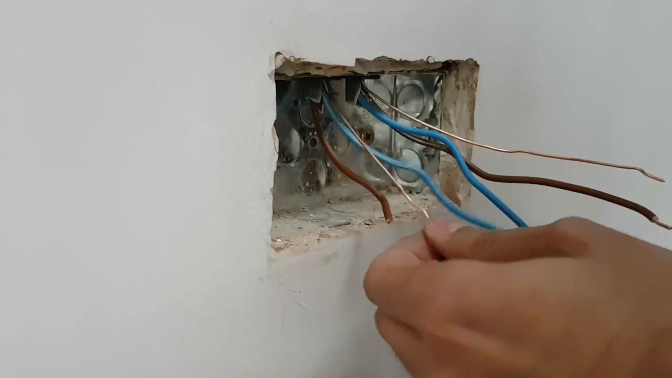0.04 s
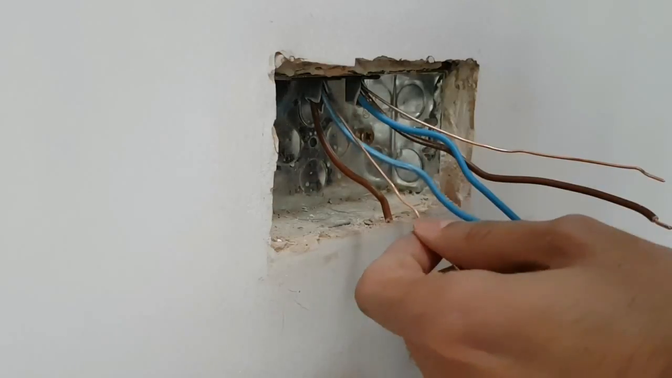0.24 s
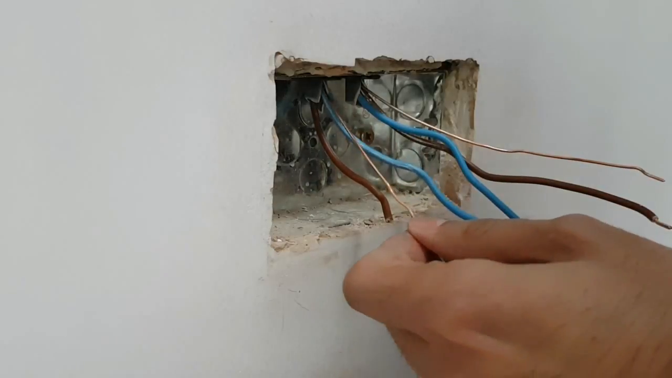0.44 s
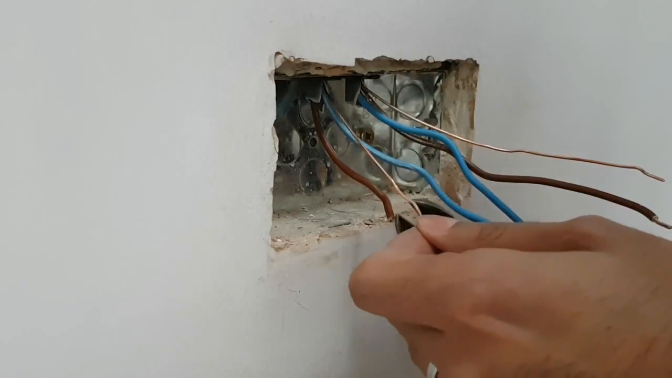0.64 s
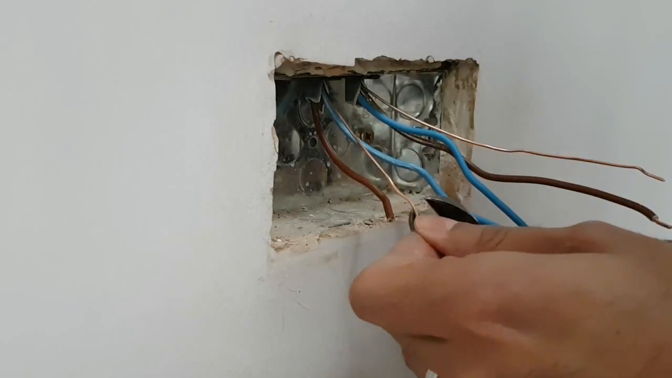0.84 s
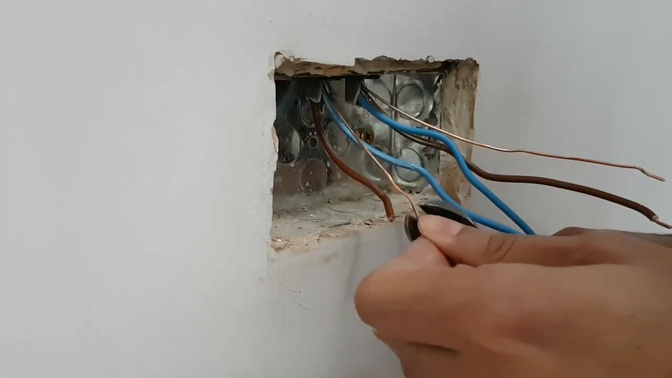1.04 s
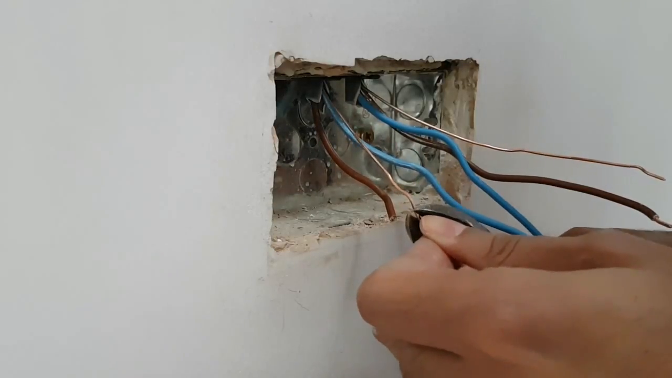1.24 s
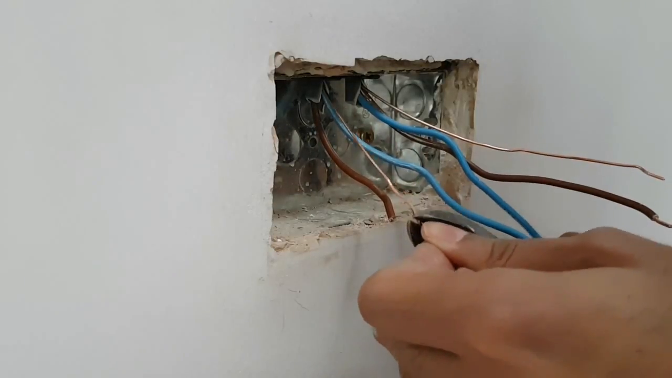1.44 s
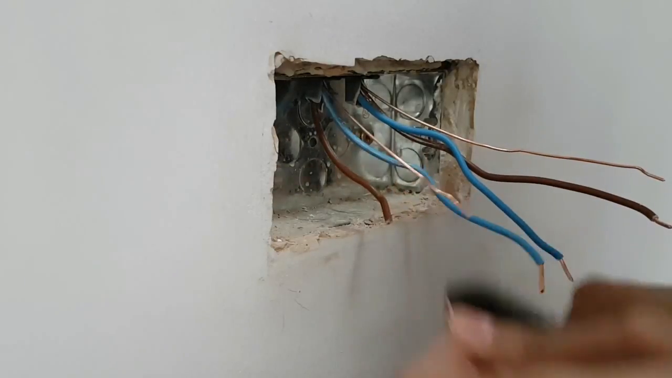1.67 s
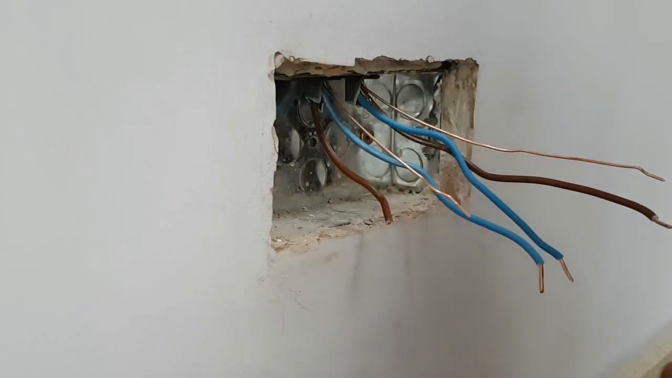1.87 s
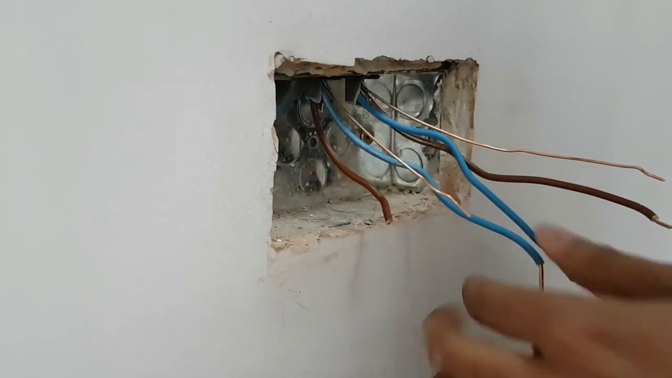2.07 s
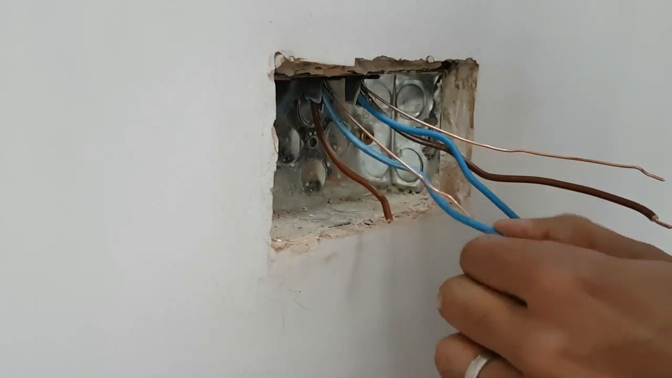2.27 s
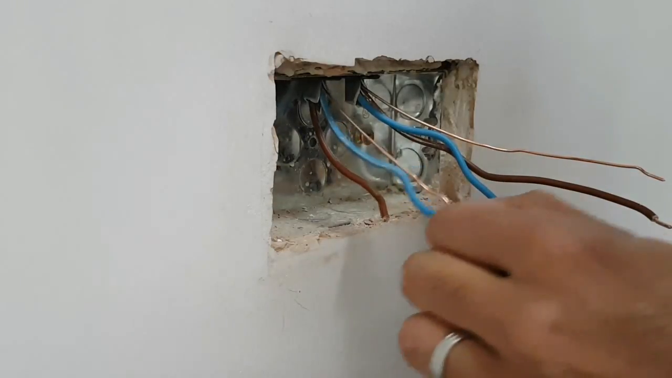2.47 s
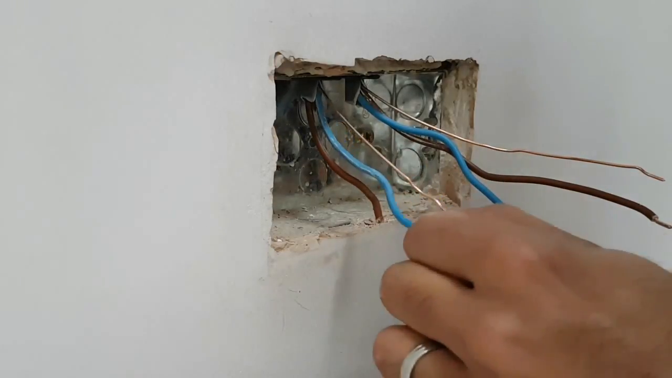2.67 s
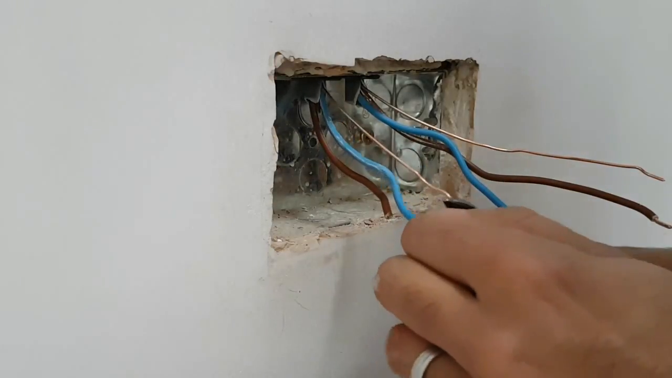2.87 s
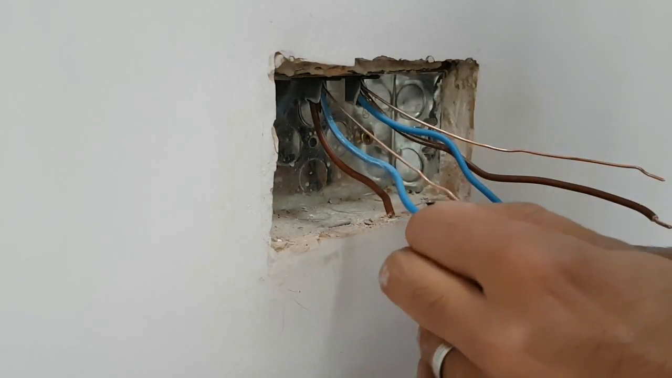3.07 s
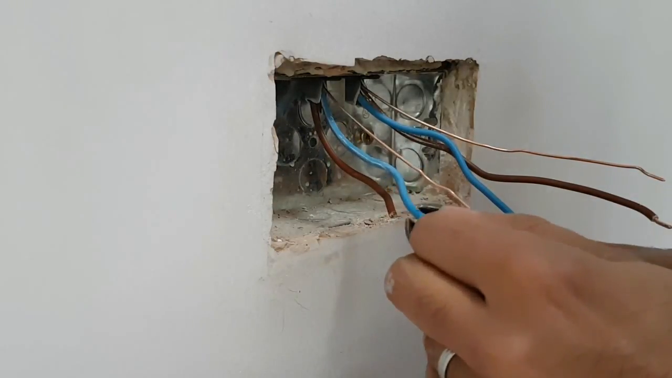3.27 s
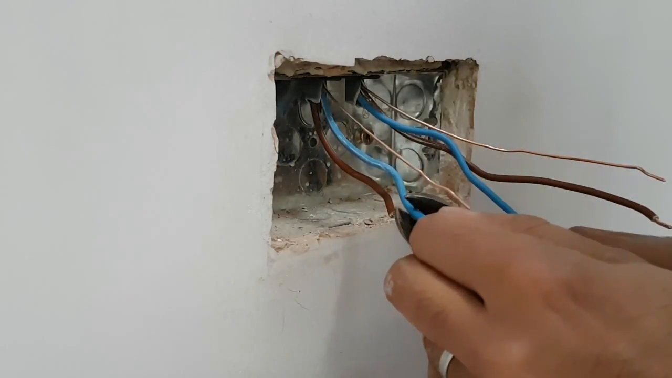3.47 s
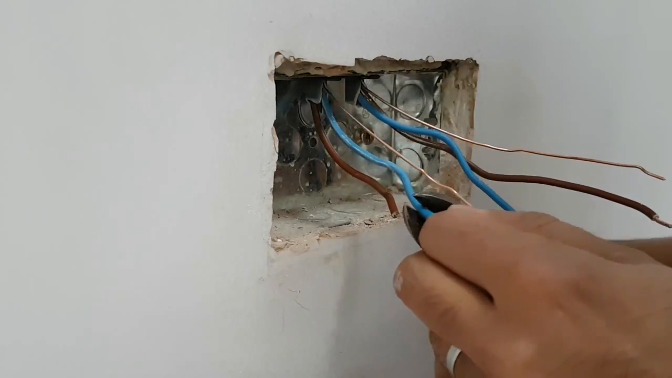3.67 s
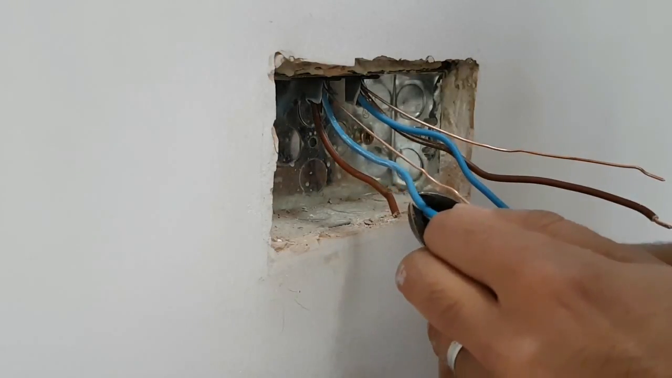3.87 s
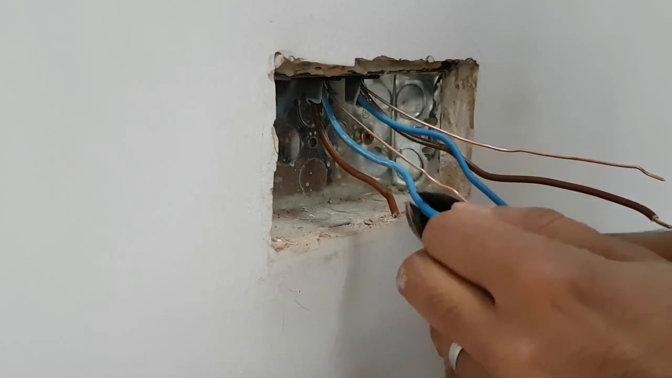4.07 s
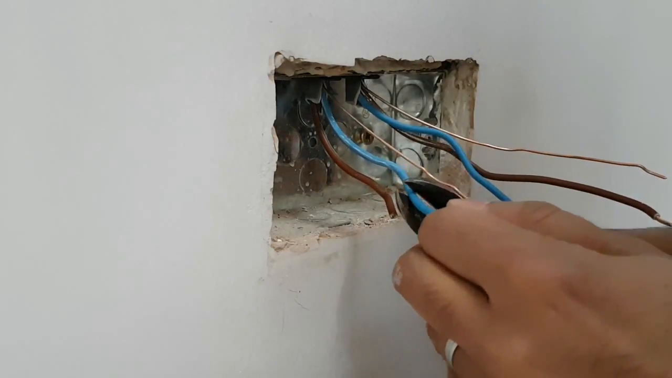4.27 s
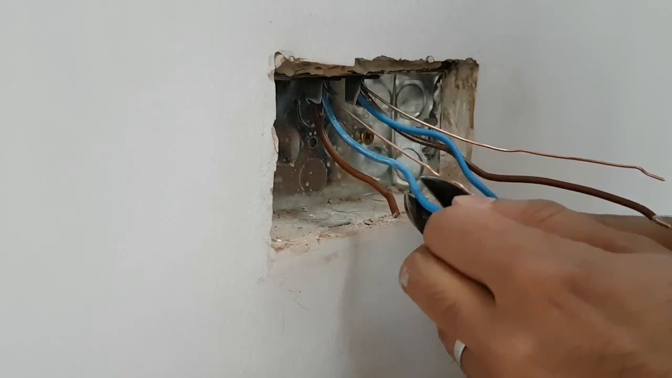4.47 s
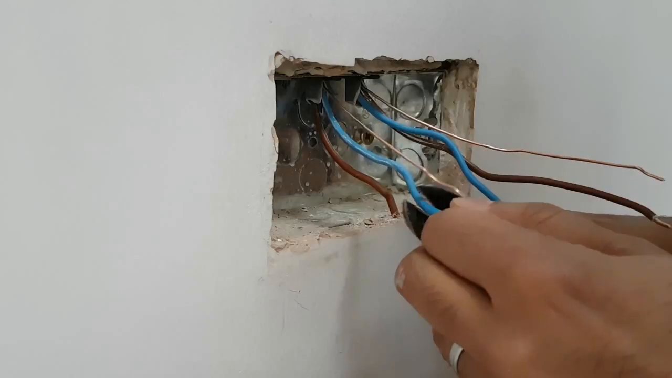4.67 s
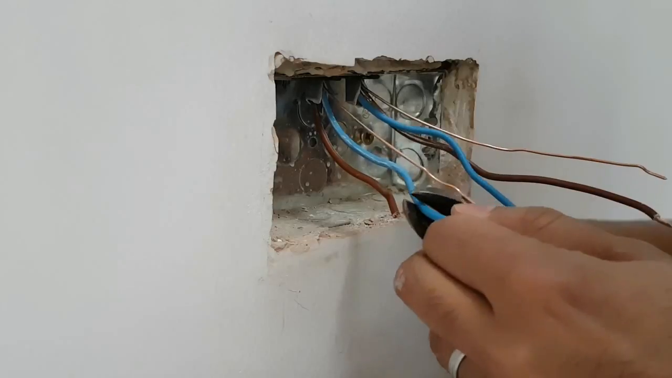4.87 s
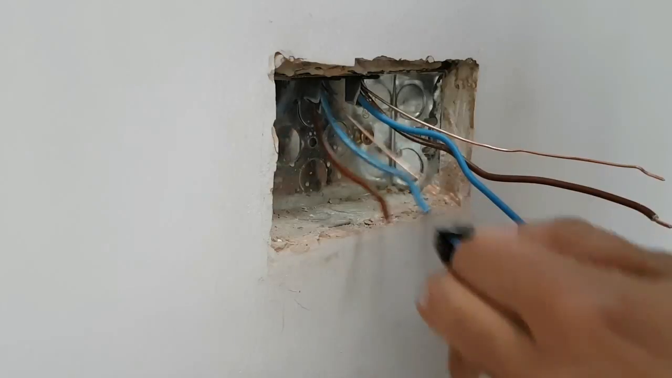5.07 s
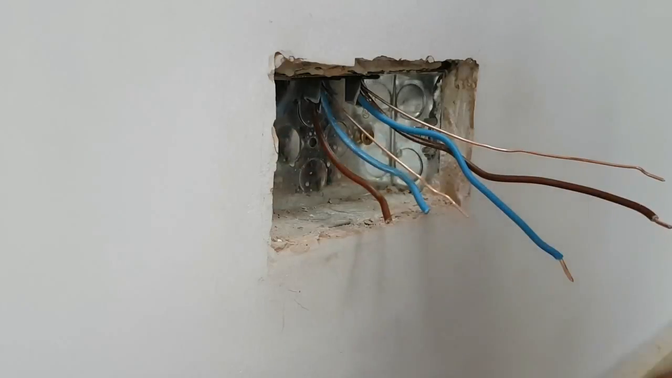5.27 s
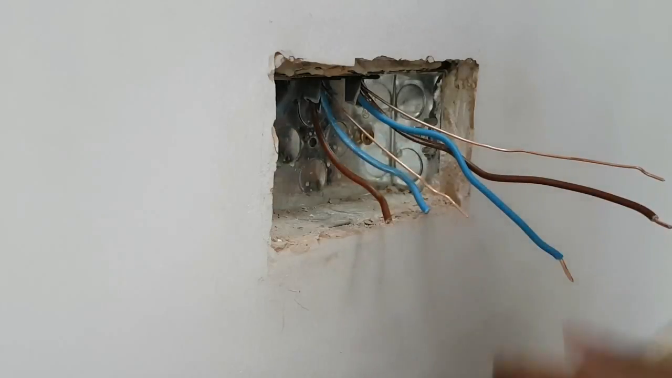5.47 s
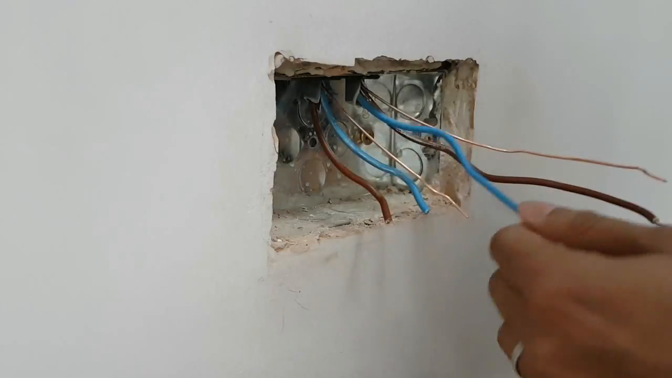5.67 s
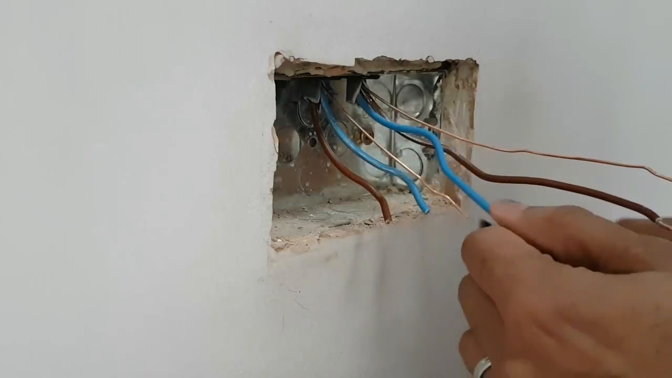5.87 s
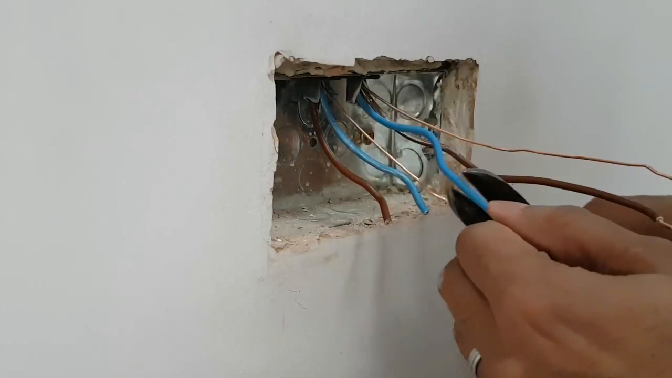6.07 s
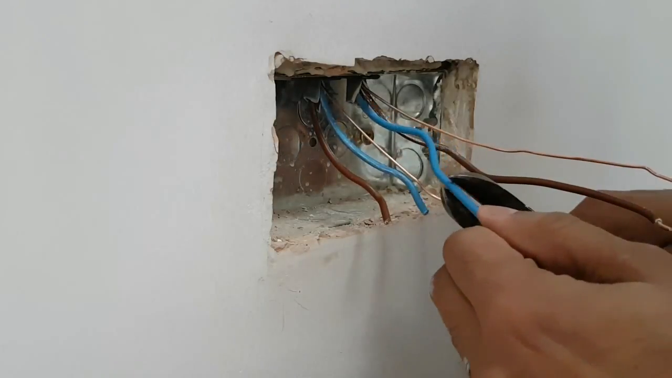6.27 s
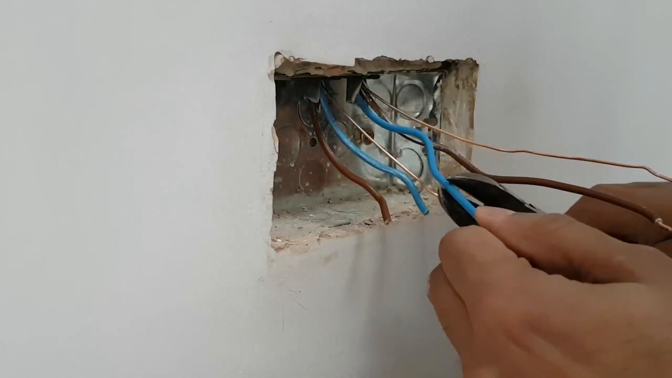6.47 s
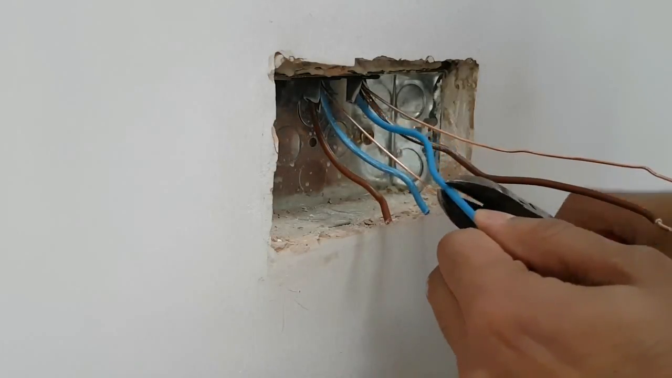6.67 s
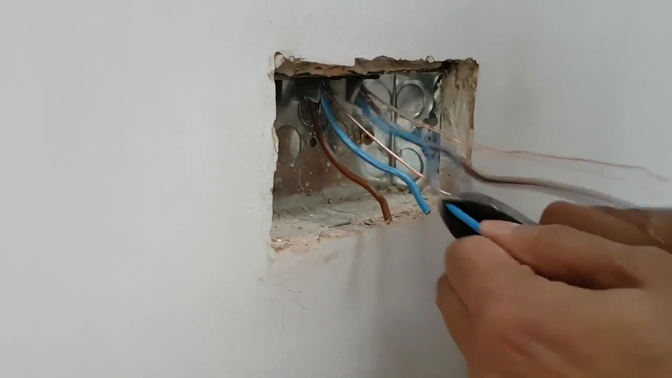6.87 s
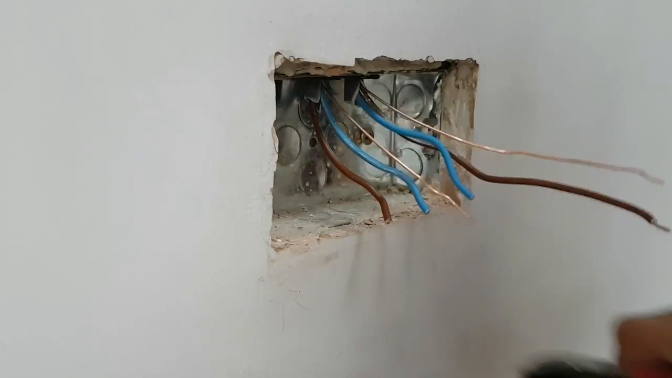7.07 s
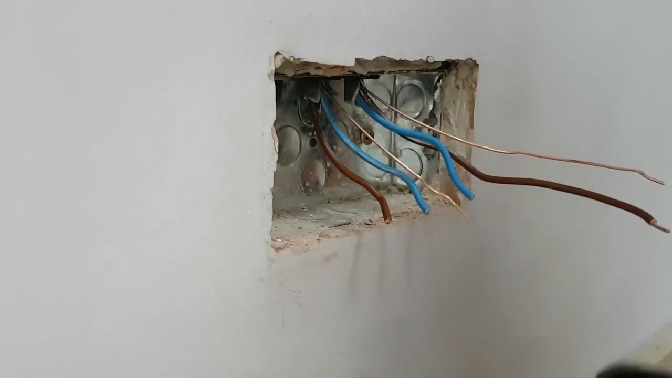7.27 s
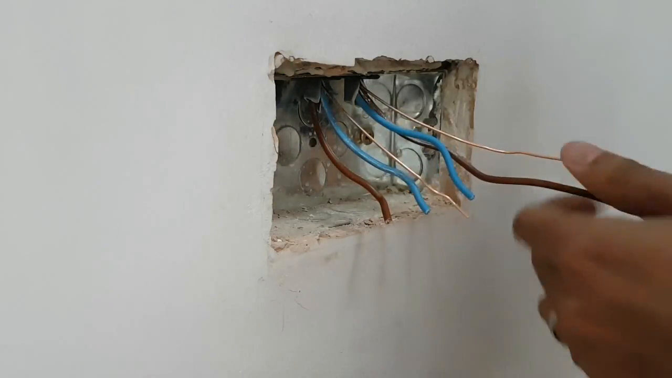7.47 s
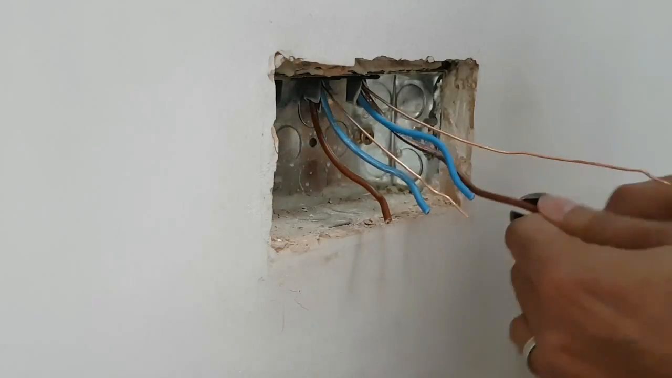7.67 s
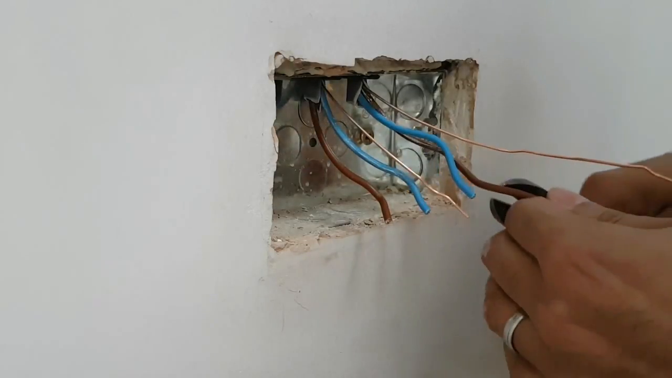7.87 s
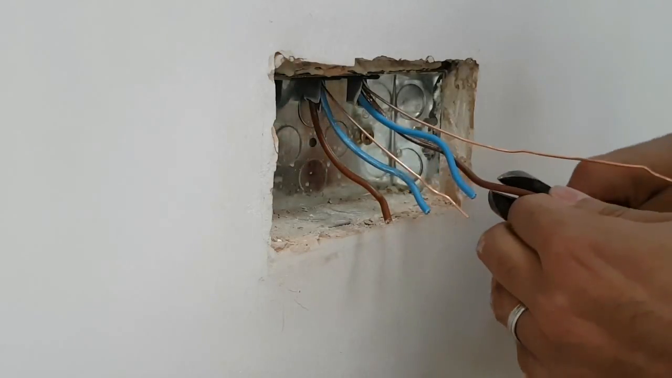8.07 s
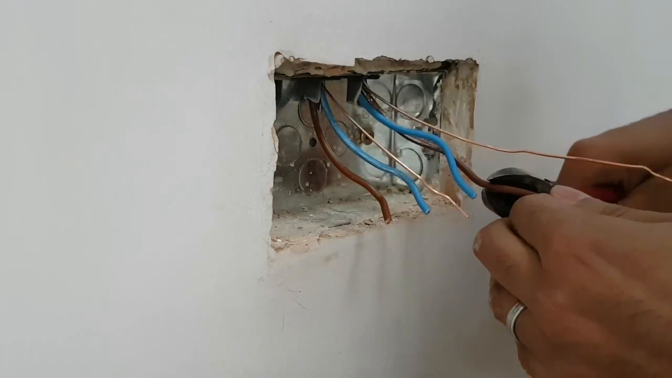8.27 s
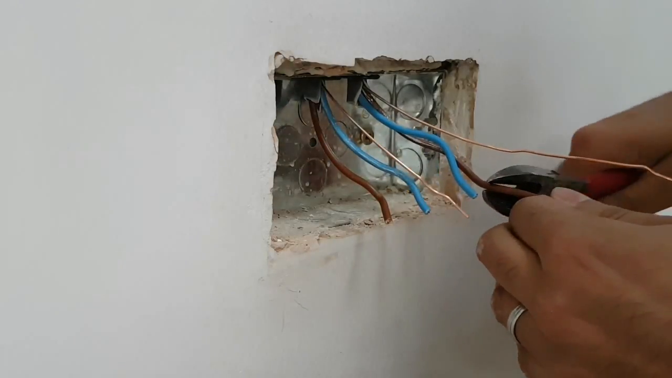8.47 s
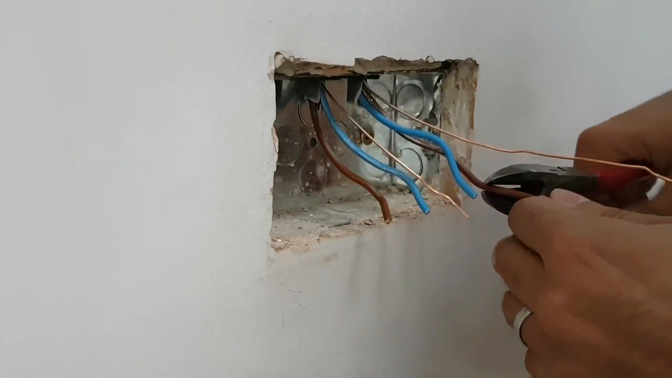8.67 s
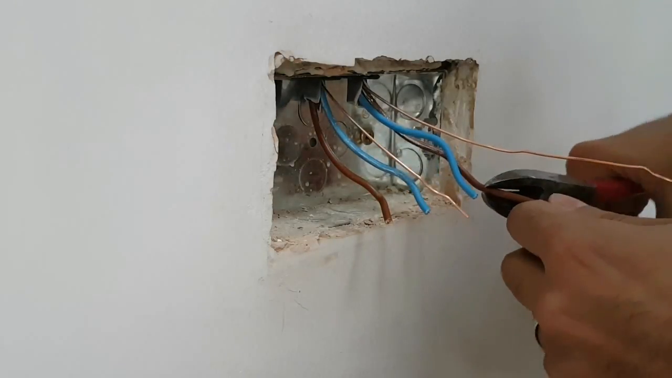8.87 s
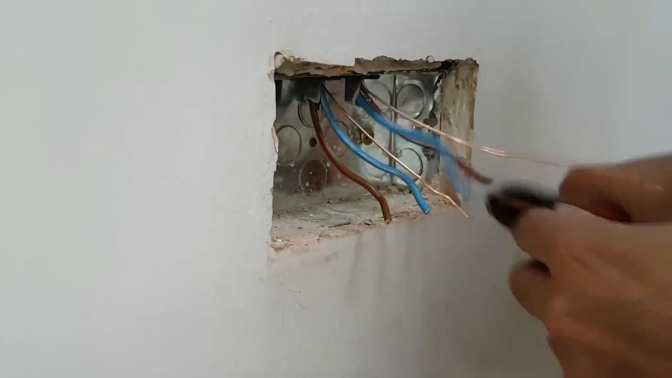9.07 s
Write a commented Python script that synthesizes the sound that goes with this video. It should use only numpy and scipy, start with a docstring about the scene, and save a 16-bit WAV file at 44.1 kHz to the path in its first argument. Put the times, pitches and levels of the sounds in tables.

```python
"""A bare, hard room, the stereo microphone close to side cutters at a wall box. Over quiet air and a faint
rumble that comes and goes, the jaws tick on a copper core. At 1.7 s it snaps, overloading the microphone;
the offcut lands across the room and bounces in ever shorter hops. The tool ticks, rubs and squeaks on the
insulation between this cut and two more, at 5.2 and 7.1 s, each with its own overload and falling offcut.
At last, at 8.7 s, the jaws bite into a fourth core with a dull knock."""
import sys
import numpy as np
from scipy import signal
from scipy.fft import rfft, irfft, next_fast_len
from scipy.io import wavfile
from scipy.ndimage import uniform_filter1d

SR = 44100
rng = np.random.default_rng(int(sys.argv[2]) if len(sys.argv) > 2 else 0)


def dump(signal):
    """Clip the signal to [-1, 1] and save it as 16-bit WAV at the path in sys.argv[1]."""
    limited = np.clip(np.atleast_2d(signal).T, -1, 1)
    pcm = np.round(limited * 32767).astype(np.int16)
    wavfile.write(sys.argv[1], SR, pcm)


N = 402633
TAIL = 32768  # samples for one event to die away
AGE = np.arange(TAIL) / SR  # seconds since the event began

# The room's still air. Each row: frequency in Hz, gain in dB.
AIR_COLOUR = [(30, -15.5), (80, -19), (120, -21), (280, -13.5), (350, -14.5), (400, -5), (460, -12.5),
              (690, -15), (1100, -16.5), (1800, -18), (4000, -24.5), (9000, -31.5), (13000, -28.5),
              (15500, -26)]
# The low rumble. Each row: frequency in Hz, gain in dB.
RUMBLE_COLOUR = [(20, -10.5), (45, -12.5), (80, -6), (110, -1), (140, -1), (175, -6.5), (230, -16.5),
                 (400, -25.5), (1000, -56.5)]
# Its swells. Each row: time in seconds, relative level in dB.
RUMBLE_SWELLS = [(0.0, -71), (1.24, -70), (1.8, -57), (2.15, -63.5), (2.99, -54), (4.82, -61.5),
                 (5.25, -53.5), (5.83, -73.5), (9.1, -68.5)]
# Reverberation of the bare room. Each row: band centre in Hz, t60 in seconds, gain in dB.
ROOM_BANDS = [(99, 0.075, 2.5), (323, 0.22, 11.5), (567, 0.49, -0.5), (1256.4, 0.52, -1.5), (2560, .48, -3),
              (3866, 0.51, -4), (6930, .42, -7.5), (10000, 0.35, -8), (15000, 0.25, -12.5)]
# Echoes off the floor and side wall. Each row: delay in seconds, relative strength.
ECHOES = [(.0085, 1.3), (0.0192, 1.4)]
# The tool ringing in the hand. Each row: multiple of the body pitch, t60 in seconds, gain in dB.
TOOL_MODES = [(.25, .03, -23), (.41, .04, -21), (.58, 0.016, -19.5), (.85, .03, -9), (1, 0.041, 5),
              (1.18, 0.024, -12), (1.58, 0.022, -13), (1.95, .04, -16), (2.1, 0.02, -14.5)]
# Steel scraping insulation. Each row: frequency in Hz, gain in dB.
SCRAPE_COLOUR = [(100, -23), (400, -12), (1000, -5.5), (1600, -0.5), (2300, -0.5), (3000, -1), (3900, -8.5),
                 (5000, -6), (6000, -15), (8000, -10.5), (10000, -22), (15000, -21)]
# The core's dull knock against the jaws. Each row: frequency in Hz, gain in dB.
THUD_COLOUR = [(100, -19.5), (250, -7.5), (450, -2.5), (700, 2), (1400, -1), (2200, -0.5), (3000, -22),
               (6000, -35)]
# Slow squeezes of the handles. Each row: start and end in seconds, peak level in dB.
SQUEEZES = [(1.592, 1.75, -54), (2.955, 3.556, -65), (3.758, 3.886, -57), (4.14, 4.448, -62.5),
            (4.495, 4.78, -65), (4.794, 4.996, -55), (5.087, 5.181, -62.5)]
# Steel catching, then slipping on insulation. Each row: start in seconds, level in dB, length in seconds,
# first and last pitch in Hz, roughness as a share of the pitch, catch level in dB, its body pitch in Hz.
SQUEAKS = [(2.973, -36, 0.044, 2228, 2320, 0.019, -23, 980),
           (3.093, -47, 0.0334, 2180, 1900, 0.046, -23, 1010),
           (6.225, -50, 0.083, 1947, 2265, .07, -30, 1410), (6.453, -50, .038, 2220, 2390, .06, -32, 2260),
           (6.978, -40, .026, 2340, 2140, .03, -21, 2370)]
# Jaws biting a core. Each row: start in seconds, level in dB, body pitch in Hz, relative scrape in dB.
BITES = [(0.046, -21.5, 1264, -0.5), (1.335, -28, 984, -3), (1.445, -27.5, 964, -9),
         (1.63, -14.5, 954, -7.5), (3.189, -16.5, 977, -17), (3.294, -24.5, 961, -14),
         (3.564, -25.5, 945, -18.5), (4.288, -24, 958, 0), (4.326, -26.5, 954, -15.5),
         (4.635, -38, 1014, 6), (4.8852, -18.5, 932, -5), (4.899, -27, 945, 0.5), (5.987, -23.5, 453, -8.5),
         (6.313, -31, 981, -2.5), (6.843, -18.5, 920, -10.5), (7.806, -38.5, 990, 4.5),
         (8.132, -16, 950, -26.5), (8.457, -30.5, 1226, -8.5), (8.6785, 13, 1046, -37)]
# An offcut's impact. Each row: frequency in Hz, gain in dB.
LANDING_COLOUR = [(60, -29), (200, -17), (350, -4), (620, 10), (1000, 4.5), (1700, 3.5), (2600, 4),
                  (4500, -2), (8000, -1), (15000, -5)]
# A bare offcut's ring; the top two modes beat. Each row: frequency in Hz, t60 in seconds, gain in dB.
COPPER_MODES = [(5330, .3, -4), (10080, .36, -3), (11560, .33, 2), (11650, .25, -1)]
# One offcut per cut. Each row: landing time in seconds, level in dB, treble cutoff in Hz, relative room
# sound in dB, first hop in seconds, ratio of each hop to the last, first bounce in dB,
# loss per further bounce in dB, copper ring of the first bounce in dB.
OFFCUTS = [(2.3061, 4, 2050, -7, 0.09, 0.86, -22.5, 2, -29.5),
           (5.5932, -14, 13010, 2, .122, 0.57, -23.5, 10, -54),
           (7.411, -7.5, 11600, 1.5, .171, 0.22, -20.5, 9, -51)]
# The copper's fracture. Each row: frequency in Hz, gain in dB.
CRACK_COLOUR = [(40, 1.5), (150, -3.5), (300, -8.5), (550, -0.5), (850, -4.5), (1600, 0.5), (2200, 0),
                (3050, -1), (4600, -2.5), (7500, 3), (9500, -3.5), (14000, -3.5), (16000, -16)]
# The steel jaws' resonances. Each row: centre and width in Hz, boost in dB at a ring strength of one.
JAW_MODES = [(2326, 290, 4), (3746, 450, 12.5), (5985, 220, 0), (5740, 380, 5), (6198, 340, 7),
             (8040, 230, 6), (10300, 130, 3), (13100, 600, 1)]
# Cores parting. Each row: start in seconds, crack level in dB, burst length in seconds, relative room
# sound in dB, jaw pitch factor, jaw ring strength, treble tilt in dB per octave, thump in dB, left minus
# right in dB, the snap's lower resonance in Hz and boost in dB, its upper resonance in Hz and boost in dB.
# On the second snap the lower resonance is a low room boom.
SNAPS = [(1.7132, 20, .0036, -2.5, 1.0, 0.58, 2.73, -8.5, -2, 1345, 10, 1900, 1),
         (5.2085, 27, 0.0024, -4.5, 1.0, 0.99, 3.5, 3, -1, 125, 11.5, 2290, 12),
         (7.0669, 20.5, 0.0028, -0.5, 1.0, 0.88, 2.5, -16, -0.5, 848, 6.5, 1298, 7.5)]


def undb(db):
    """Decibels to gain."""
    return 10 ** (np.asarray(db) / 20)


def unit(x):
    """Scale to an energy of one per channel."""
    return x / np.sqrt(np.sum(x ** 2, axis=-1, keepdims=True))


def decay(t60):
    """Envelope that falls 60 dB in t60 seconds."""
    return np.exp(-np.log(1000) * AGE / t60)


def add(out, start_s, x):
    """Mix a sound in from its start time."""
    i = max(int(start_s * SR), 0)
    out[:, i:i + x.shape[-1]] += x[..., :N - i]


def freqs(size=TAIL):
    """Frequencies in Hz of a spectrum of this many samples."""
    return np.maximum(np.fft.rfftfreq(size, 1 / SR), 1)


def curve(points, size=TAIL):
    """Spread (Hz, value) points over a spectrum, on a log axis."""
    hz, value = np.transpose(points)
    return np.interp(np.log(freqs(size)), np.log(hz), value)


def humps(modes):
    """Gain in dB per frequency of (Hz, width, dB) resonances."""
    return sum(db / (1 + (2 * (freqs() - hz) / width) ** 2) for hz, width, db in modes)


def through(x, response):
    """Convolve, keeping one tail's length."""
    return signal.fftconvolve(np.atleast_2d(x), np.atleast_2d(response), axes=-1)[:, :TAIL]


def colour(x, shape_db):
    """Causal filter of this spectral shape; white noise keeps its power."""
    cepstrum = irfft(np.log(undb(shape_db)))
    cepstrum[1:TAIL // 2] *= 2  # fold to minimum phase
    cepstrum[TAIL // 2 + 1:] = 0
    response = irfft(np.exp(rfft(cepstrum)))
    return through(x, unit(response))


def ring(modes, pitch=1):
    """Decaying sines; neighbours start in opposite directions, so the ring swells in."""
    return unit(sum((-1) ** k * undb(db) * decay(t60) * np.sin(2 * np.pi * pitch * frequency * AGE)
                    for k, (frequency, t60, db) in enumerate(modes)))


def burst(length_s, order=2):
    """Tiny fractures or slips, different at each microphone port; a higher order stops more abruptly."""
    return unit(rng.standard_normal((2, TAIL)) * np.exp(-(AGE / length_s) ** order))


def diffuse(size, apart_hz=650):
    """Spectrum of noise from all sides: the microphone's ports share the bass, but not the treble."""
    mid, side = rfft(rng.standard_normal((2, size)))
    width = np.clip(freqs(size) / apart_hz, .3, 1)
    return (mid + np.array([[1], [-1]]) * width * side) / np.sqrt(1 + width ** 2)


def ambience(spectrum, db):
    """Noise all around the microphone, of a given colour and level."""
    size = 2 * next_fast_len(N // 2 + 1)
    noise = irfft(diffuse(size) * undb(curve(spectrum, size)))[:, :N]
    return undb(db) * noise / noise.std()


def room_tone(air_db=-60, hum_hz=124, hum_db=-78, rumble_lift_db=3.5):
    """The place itself: quiet air, a faint steady hum and a low rumble that swells and fades."""
    t = np.arange(N) / SR
    swell_db = np.interp(t, *np.transpose(RUMBLE_SWELLS))
    rumble = ambience(RUMBLE_COLOUR, swell_db + rumble_lift_db)
    hum = undb(hum_db) * np.sqrt(2) * np.sin(2 * np.pi * hum_hz * t)
    return ambience(AIR_COLOUR, air_db) + hum + rumble


def room(early_boost=0.79, early_s=0.09, onset_s=0.0048, echo_width_s=.0016):
    """The walls as the microphone hears them: two strong echoes, then a dense tail, longest in the mids."""
    noise, log_centres = diffuse(TAIL), np.log([row[0] for row in ROOM_BANDS])
    tail = 0
    for share, (_, t60, db) in zip(np.eye(len(ROOM_BANDS)), ROOM_BANDS):
        band = irfft(noise * np.interp(np.log(freqs()), log_centres, share))
        tail = tail + band * undb(db) * decay(t60)
    echoes = sum(strength * np.exp(-((AGE - delay_s) / echo_width_s - 1) ** 2)
                 for delay_s, strength in ECHOES)
    envelope = np.minimum(AGE / onset_s, 1) * (1 + early_boost * np.exp(-AGE / early_s))
    return unit(tail * (envelope + echoes))


def tool(body_hz, band_hz=(420, 2400)):
    """The hand-held tool rings: too small to radiate bass, its treble cushioned by the insulation."""
    bandpass = signal.butter(2, band_hz, "band", fs=SR, output="sos")
    return signal.sosfilt(bandpass, ring(TOOL_MODES, body_hz))


def rubbing(slips_per_s=170, body_hz=965, scrape_db=-4, scrape_s=.005, tightening_share=.35):
    """As the grip tightens and eases, tiny uneven slips keep the tool humming and scratch the insulation."""
    t = np.arange(N) / SR
    grip = sum(np.interp(t, [start, start + tightening_share * (end - start), end], [0, undb(db), 0])
               for start, end, db in SQUEEZES)
    slips = (rng.random(N) < slips_per_s / SR) * rng.standard_normal(N)
    one_slip = tool(body_hz) + undb(scrape_db) * colour(burst(scrape_s), curve(SCRAPE_COLOUR))
    return signal.fftconvolve([grip * slips / slips.std()], one_slip, axes=-1)[:, :N]


def bite(db, body_hz, walls, scrape_db=0, room_db=-12, thud_db=-18, scrape_room_db=-3, slip_db=-5):
    """The jaws give way in a small jerk that knocks the tool, thuds and scrapes the insulation."""
    contact_s = 0.0031 * 2 ** (-db / 14)  # 14 dB louder is half as long
    jerk = undb(slip_db) * burst(contact_s)[0] * contact_s / 0.001  # long contacts are mostly slip
    jerk[0] += 1
    knock = unit(through(jerk, tool(body_hz)))
    knock = knock + undb(room_db) * through(knock, walls)
    thud = colour(burst(contact_s) + walls, curve(THUD_COLOUR))
    scrape = colour(burst(contact_s) + undb(scrape_room_db) * walls, curve(SCRAPE_COLOUR))
    return undb(db) * (knock + undb(thud_db) * thud + undb(scrape_db) * scrape)


def squeaks(room_db=-7, overtone_db=-34):
    """The edge catches, then slides in a short stick-slip chirp with an unsteady rate."""
    out, walls = np.zeros((2, N)), room()
    for start_s, db, length_s, first_hz, last_hz, roughness, catch_db, body_hz in SQUEAKS:
        progress = np.minimum(AGE / length_s, 1)
        glide_hz = first_hz + (last_hz - first_hz) * progress
        wobble = uniform_filter1d(rng.standard_normal(TAIL), size=40)
        phase = 2 * np.pi * np.cumsum(glide_hz * (1 + roughness * wobble / wobble.std())) / SR
        tone = np.sin(phase) + undb(overtone_db) * np.sin(2 * phase)
        chirp = undb(db) * np.sin(np.pi * progress) * tone
        catch = bite(catch_db, body_hz, walls)
        add(out, start_s, catch + chirp + undb(room_db) * through(chirp, walls))
    return out


def bites():
    """Close by, the jaws tick as they settle on a core; the last bite is a loud knock."""
    out, walls = np.zeros((2, N)), room()
    for start_s, db, body_hz, scrape_db in BITES:
        add(out, start_s, bite(db, body_hz, walls, scrape_db))
    return out


def landing(db, cutoff_hz, room_db, walls, contact_s=0.0058):
    """An offcut hits something across the room, with a dull knock or a bright tap."""
    shape_db = curve(LANDING_COLOUR) - 10 * np.log10(1 + (freqs() / cutoff_hz) ** 4)
    return undb(db) * colour(burst(contact_s) + undb(room_db) * walls, shape_db)


def offcuts(bounces=3, bounce_cutoff_hz=13700, bounce_room_db=1.5):
    """Off microphone, each offcut lands, then tinkles through light, bright, ever shorter, weaker hops."""
    out, walls = np.zeros((2, N)), room()
    copper = ring(COPPER_MODES)
    tinkle = copper + through(copper, walls)
    for at_s, db, cutoff_hz, room_db, hop_s, hop_ratio, bounce_db, loss_db, copper_db in OFFCUTS:
        add(out, at_s, landing(db, cutoff_hz, room_db, walls))
        for k in range(bounces):
            at_s += hop_s * hop_ratio ** k
            tap = landing(bounce_db, bounce_cutoff_hz, bounce_room_db, walls)
            add(out, at_s, undb(-k * loss_db) * (tap + undb(copper_db) * tinkle))
    return out


def snaps(resonance_width_hz=320, thump_hz=88, thump_t60=0.049, tilt_above_hz=500):
    """Close to the microphone the copper breaks and the jaws slam shut; each snap has its own ring."""
    out = np.zeros((2, N))
    rocking = np.array([[-.5], [1]])  # the jolt rocks the two ports in opposite directions
    thump = rocking * np.sin(2 * np.pi * thump_hz * AGE) * decay(thump_t60)
    for (start_s, db, length_s, room_db, jaw_pitch, jaw_ring, tilt_db, thump_db, pan_db,
         low_hz, low_db, high_hz, high_db) in SNAPS:
        jaws_db = jaw_ring * humps([(jaw_pitch * hz, width, boost) for hz, width, boost in JAW_MODES])
        ring_db = humps([(low_hz, resonance_width_hz, low_db), (high_hz, resonance_width_hz, high_db)])
        treble_db = tilt_db * np.log2(np.maximum(freqs(), tilt_above_hz))
        fracture = burst(length_s, order=4) + undb(room_db) * room()
        crack = colour(fracture, curve(CRACK_COLOUR) + jaws_db + ring_db + treble_db)
        gains = undb(db + np.array([[pan_db], [-pan_db]]) / 2)
        add(out, start_s, gains * crack + undb(thump_db) * thump)
    return out


def scene():
    """What reaches the microphone: the cutters close, the offcuts farther off, the room all around."""
    return snaps() + offcuts() + bites() + rubbing() + squeaks() + room_tone()


def record(dry, top_hz=15700):
    """The microphone clips at full scale and cuts the highest treble."""
    lowpass = signal.ellip(8, .2, 70, top_hz, fs=SR, output="sos")
    return signal.sosfilt(lowpass, np.clip(dry, -1, 1))


dry = scene()
out = record(dry)
dump(out)
```